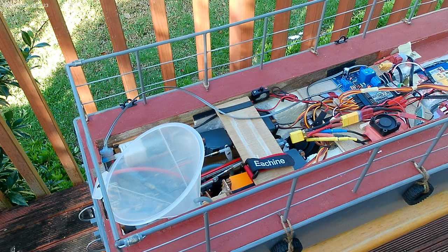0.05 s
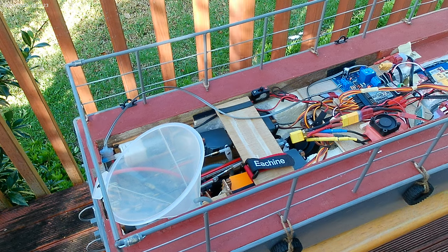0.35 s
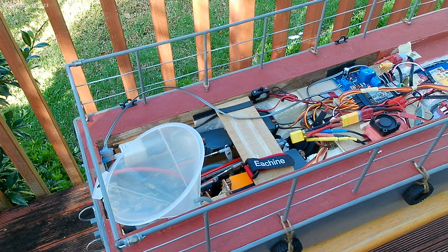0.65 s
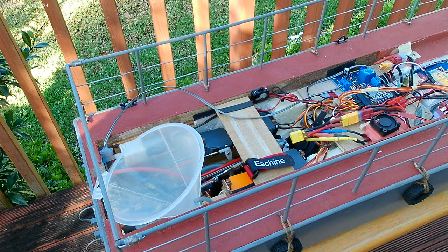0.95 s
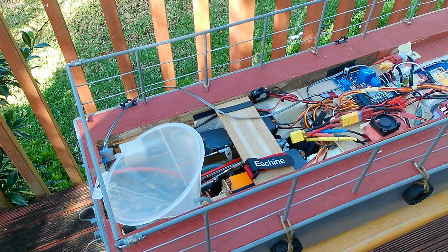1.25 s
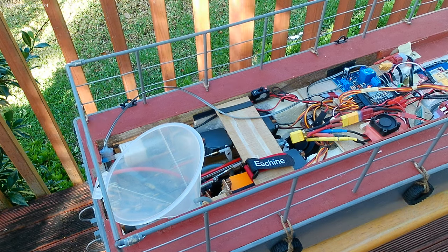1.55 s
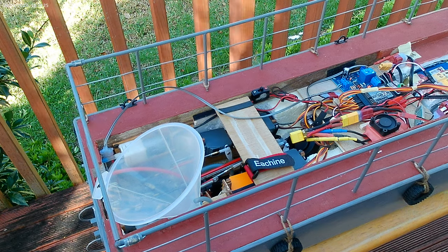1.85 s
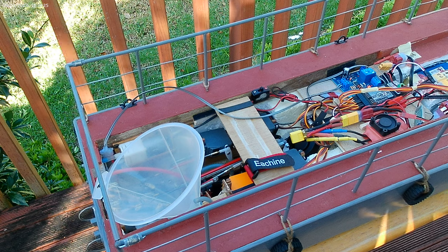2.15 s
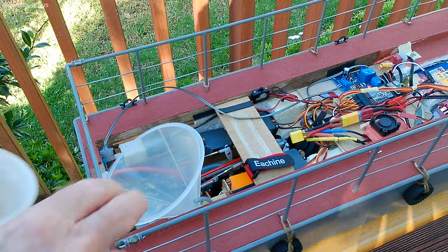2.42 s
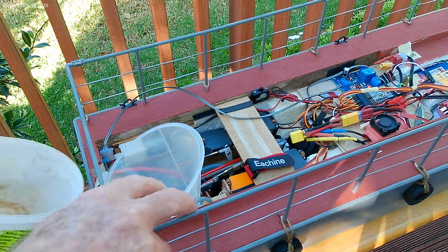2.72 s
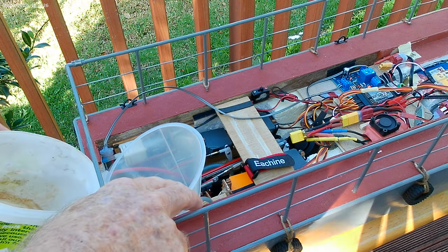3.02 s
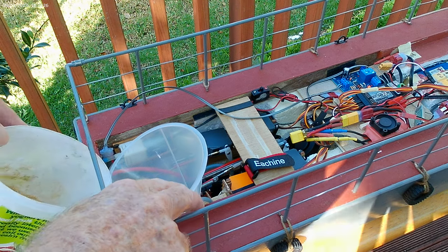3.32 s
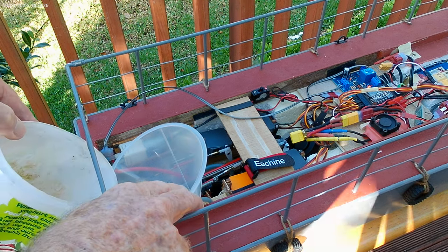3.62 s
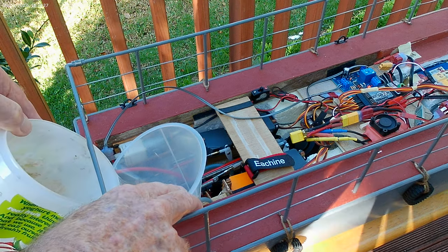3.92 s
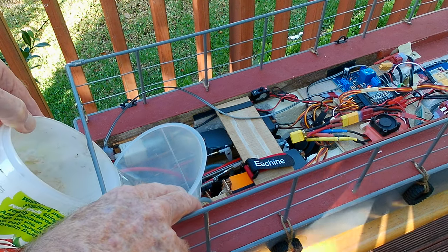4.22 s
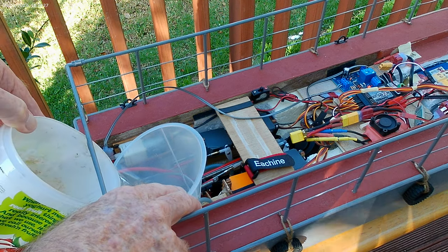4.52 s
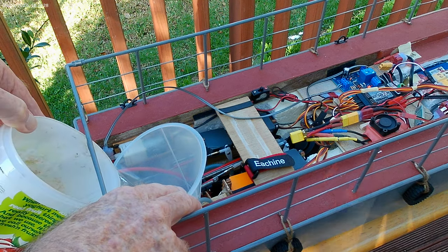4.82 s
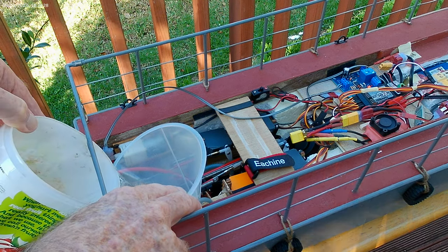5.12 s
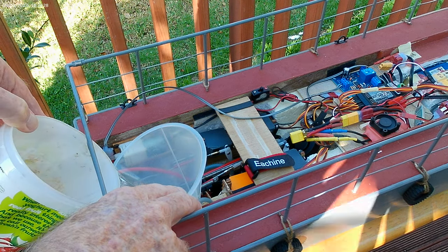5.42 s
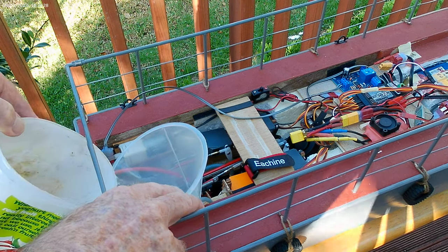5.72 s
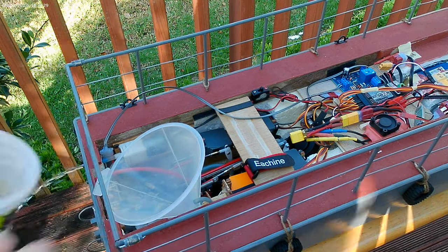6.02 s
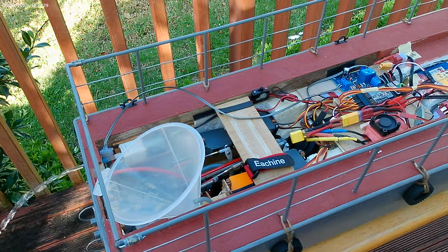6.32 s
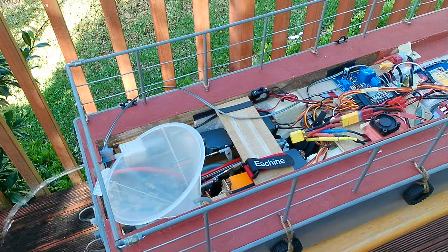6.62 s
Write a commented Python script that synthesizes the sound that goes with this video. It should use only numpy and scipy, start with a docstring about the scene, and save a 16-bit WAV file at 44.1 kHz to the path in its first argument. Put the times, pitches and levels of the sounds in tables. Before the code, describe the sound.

A small electronics fan in a model boat hums throughout, with airy hiss, a thin whine and a few faint high ticks. Behind it is low outdoor traffic rumble: one distant engine slows and fades by about 2 seconds, while another sags, then gradually gathers speed. A breeze softly thumps the microphone now and then, most strongly near 4.9 seconds. From 4 to about 5.3 seconds, water poured through a funnel drips and trickles into the hull with small knocks and bubbly plips. At 5.4 seconds a relay gives one sharp click, and a small electric pump starts at once. It gulps air with several glugs until about 5.9 seconds, then settles into a steady low hum and buzz through the hull, with churning water and a faint hissing jet, running until the end near 7 seconds.

```python
"""A model boat stands on a garden deck, its electronics fan humming; a breeze nudges the microphone.
Of two far engines, one slows and fades within two seconds, while the other sags, then gathers speed.
From 4 s, water poured through a funnel plips into the hull: each drop knocks and traps ringing bubbles.
At 5.4 s a relay clicks and a small bilge pump starts. Its impeller shakes the hull, gulps air,
churns the water and sends a thin, hissing jet overboard."""
import sys
import numpy as np
from scipy import signal
from scipy.fft import rfft, irfft, next_fast_len
from scipy.io import wavfile
from scipy.ndimage import uniform_filter1d

SR = 44100
rng = np.random.default_rng(int(sys.argv[2]) if len(sys.argv) > 2 else 0)


def file_out(sig):
    """Save sig as 16-bit WAV at sys.argv[1]."""
    # one column per channel
    cols = np.atleast_2d(sig).T
    # limit, then scale
    lim = np.clip(cols, -1, 1)
    pcm = np.round(lim * 32767).astype(np.int16)
    wavfile.write(sys.argv[1], SR, pcm)


N = 302194
T = np.arange(N) / SR

# eddies on the microphone and dull road rumble: frequency_hz, density_db
EDDY_SPECTRUM = [(10, -1.5), (22, -0.5), (40, -7), (65, -9), (110, -23.5), (250, -40)]
RUMBLE_SPECTRUM = [(35, 1), (52, 10), (75, -6), (100, 9.5), (140, -7.5), (190, -12.5)]
# gusts of wind: crest_s, half_length_s, level_db
GUSTS = [(.03, 0.18, -45.5), (.58, 0.031, -40), (1.83, 0.025, -45.5), (3.23, 0.12, -43.5),
         (3.62, 0.19, -41), (3.94, 0.071, -40), (4.77, 0.051, -37.5), (4.885, 0.042, -34),
         (6.0, 0.074, -43), (6.47, 0.036, -40)]
# fundamental of the slowing engine: time_s, pitch_hz
SLOWING_PITCH = [(0, 135.6), (.2, 137.9), (.72, 115.3), (1.12, 117.1), (1.36, 98.3), (1.8, 84.3)]
# its harmonics: multiple, relative_db
SLOWING_ORDERS = [(1, 1), (2, -14.5), (3, -21.5)]
# firing tone of the gathering engine: time_s, level_db
DRONE_LEVEL = [(0, -45), (1, -50), (1.93, -52.5), (2.2, -44.5), (2.85, -52), (3.6, -41.5), (3.9, -42),
               (4.5, -49), (5.3, -51.5), (5.85, -60), (6.25, -45), (6.85, -49)]
# its weaker orders: firing_multiple, level_db
DRONE_ORDERS = [(1.399, -59), (1.82, -62.5), (2.41, -67)]
# its orders that swell and ebb: firing_multiple, crest_s, half_length_s, level_db
WHIRS = [(2.41, 1.7, 0.22, -54.5), (2.41, 2.82, 0.7, -55), (3.4, 2.73, 0.39, -64), (2, 4.06, 0.56, -53),
         (2, 6.06, 0.63, -52.5)]

# fourth harmonic of the fan's shaft: time_s, pitch_hz
FAN_PITCH = [(0.0, 637.4), (0.5, 644.5), (2.26, 645), (3.04, 646), (6.7, 643.4)]
# base level of the fan's hum: time_s, level_db
FAN_LEVEL = [(0, -62.5), (.6, -59.5), (2.2, -59), (3.4, -57), (4.2, -58.5), (5.4, -58), (5.8, -60),
             (6.85, -60.5)]
# its harmonics: shaft_multiple, relative_db
FAN_ORDERS = [(1, -15.5), (2, -15), (3, -7), (4, -2), (5, -4), (6, -15.5), (7, -14.5), (8, -23.5),
              (10, -23.5), (12, -30)]
# thin electric whine: time_s, pitch_hz
WHINE_PITCH = [(0, 2007), (2.2, 2014), (4.6, 2015), (5.35, 2028), (5.8, 2038), (6.3, 2031), (6.85, 2017)]
# its strength: time_s, level_db
WHINE_LEVEL = [(0, -74.5), (.6, -72), (1.4, -74), (2.5, -71.5), (4.0, -76), (5.0, -73.5), (5.85, -71),
               (6.85, -73)]
# rush and hiss of fan air and garden: frequency_hz, density_db
AIR_SPECTRUM = [(150, 2.5), (250, -6), (430, -8.5), (700, -7.5), (950, -6.5), (1150, -11.5), (1400, -18.5),
                (1800, -20.5), (2700, -22.5), (3000, -28.5)]
HISS_SPECTRUM = [(3050, -13.5), (3550, 2), (3950, -0.5), (4500, 1), (5300, 3.5), (6300, -2), (7100, -7.5),
                 (9000, -7.5), (10100, -3.5), (11200, -13.5), (15500, -14.5)]
# faint, soft, very high chirps and ticks: start_s, level_db, pitch_hz
TICKS = [(.208, -56, 14100), (.241, -57, 12300), (0.686, -63, 13770), (1.507, -64, 13400),
         (1.705, -66, 13400), (1.985, -61, 13000), (3.28, -65, 13500), (4.006, -58.5, 9150),
         (4.46, -60.5, 9200), (4.838, -57, 5450), (4.947, -62, 7200), (5.3385, -55, 5500),
         (5.371, -54, 5170), (5.835, -56, 5000), (6.694, -58, 13140)]

# swishes of running water: crest_s, length_s, level_db, centre_hz, width_octaves
SWISHES = [(0.096, 0.94, -65.5, 930, 0.75), (1.115, 0.12, -66.5, 4330, 0.46), (1.125, .1, -76, 9600, .4),
           (1.125, 0.12, -63, 1490, 1.2), (4.455, 0.11, -64.5, 1370, 0.8), (4.849, 0.28, -68, 1400, 1.1),
           (5.483, 0.14, -57.5, 1010, 0.81), (5.492, 0.16, -54, 730, 0.87), (5.802, .08, -55, 790, 0.87),
           (5.835, 0.071, -58.5, 1480, 0.63), (5.814, 0.061, -67, 2900, 0.67),
           (6.771, 0.17, -69, 3300, 1.1)]
# drops and their two bubbles: start_s, knock_db, large_hz, large_db, small_hz, small_db
DROPS = [(4.006, -54, 1520, -54, 2300, -67), (4.291, -54, 1350, -58, 2520, -64),
         (4.301, -54, 2330, -54, 2800, -61), (4.341, -48, 1130, -59, 2300, -58),
         (4.3799, -38, 1590, -57, 2110, -53), (4.421, -51, 1250, -53, 3700, -60),
         (4.438, -60, 1450, -57, 3750, -60), (4.463, -55, 1300, -57, 2100, -62),
         (4.551, -58, 1900, -63, 2980, -58), (4.573, -45, 2000, -48, 4530, -52),
         (4.785, -47, 1420, -57, 2300, -58), (4.798, -55, 1100, -54, 2400, -59),
         (4.8255, -47, 1090, -44.5, 3680, -50), (4.8546, -49, 1580, -51, 2650, -63),
         (4.872, -60, 1500, -63, 3400, -60), (4.9163, -56, 1390, -50, 1950, -65),
         (4.9493, -57, 1210, -55, 1750, -64), (5.117, -59, 1300, -59, 2500, -61),
         (5.147, -52, 1230, -54, 3620, -54.5), (5.304, -54, 1250, -59, 2400, -64),
         (5.3266, -45, 1570, -46, 2180, -52)]
# resonances of the hull cavity: pitch_hz, t60_s, relative_db
HULL_MODES = [(970, .022, -6), (1427, 0.0033, 3), (2298, 0.0038, -18), (3700, .014, -29), (4740, .014, -37)]
# dull splat of a drop: frequency_hz, density_db
SPLAT_SPECTRUM = [(700, 6), (1500, 2), (2400, -6), (3100, -21), (3800, -9), (5000, -17), (9000, -26)]
# noise band of a swish: offset_widths, density_db
SWISH_BAND = [(-1.2, -18), (-0.083, -2.5), (0.74, -14.5), (1.47, -23.5)]

# the relay's contact and its bounces: start_s, level_db
RELAY_STRIKES = [(5.40165, -28.5), (5.4038, -43), (5.4145, -53)]
# resonances of its case and of the board that carries it: pitch_hz, t60_s, relative_db
CASE_MODES = [(3750, 0.035, -20.5), (5050, .03, -14), (5620, 0.013, -1), (6080, 0.01, -4),
              (6640, 0.0091, -13), (7100, 0.02, -8), (8500, .012, -14), (8850, .016, -16),
              (10780, .02, -15.5), (13840, 0.013, -12)]
BOARD_MODES = [(1050, 0.041, 2), (1230, 0.032, -5), (700, .03, -16)]
# snap of the contact: frequency_hz, density_db
SNAP_SPECTRUM = [(5100, 0), (5800, 5), (7500, 0), (11000, -9), (14000, -13), (15500, -18)]

# air gulped as the pump catches water: start_s, pitch_hz, level_db, rise_per_s
GLUGS = [(5.484, 1150, -44, 3), (5.613, 1270, -45, 3), (5.781, 756, -39.5, 4.3), (5.815, 880, -44, 14),
         (5.818, 3200, -46, 6), (5.819, 2700, -53, 3), (5.834, 1950, -50, 6.2), (5.836, 2750, -56, 3),
         (5.841, 1150, -44, 6), (5.851, 1600, -58, 4)]
# spurts of air from the outlet: crest_s, half_length_s, level_db
SPURTS = [(5.5, 0.035, -70), (5.89, 0.096, -74)]
# airy whistles of the jet: shaft_multiple, level_db
WHISTLES = [(129.5, -82), (145, -98)]
# spray at the outlet and water churned in the pump: frequency_hz, density_db
SPRAY_SPECTRUM = [(4000, -11), (7000, 0), (8200, 2), (9100, 7), (10500, -10), (15000, -18)]
CHURN_SPECTRUM = [(100, -7), (260, 3.5), (450, -8), (720, -2.8), (1150, -7.5), (1500, -17), (2200, -15.5),
                  (3200, -24), (6000, -30.5), (12000, -41)]
# rotation of the pump: time_s, shaft_hz
PUMP_SPEED = [(5.45, 64.57), (5.578, 62.52), (5.706, 61.73), (5.932, 61.1), (6.144, 62.44), (6.37, 62.3),
              (6.47, 61.7), (6.622, 60.92), (6.85, 60.7)]
# its harmonics through the hull: shaft_multiple, level_db
PUMP_ORDERS = [(3, -66), (4, -60.3), (5, -67.5), (6, -63.5), (7, -77), (8, -72), (9, -65.5), (10, -67),
               (11, -75), (12, -61.7), (13, -66), (14, -77), (15, -59.3), (16, -73), (17, -69.5), (18, -75),
               (19, -66.3), (20, -72), (21, -80), (22, -74.5), (23, -79.5), (24, -77.5), (25, -86),
               (26, -84), (28, -79.5), (29, -85.5)]

PUMP_ON_S = 5.41
RING_SAMPLES = SR // 8


def undb(db):
    """Amplitude grows tenfold for every 20 decibels."""
    return 10 ** (np.asarray(db) / 20)


def unit(x):
    """Normalisation to rms 1."""
    return x / (np.std(x) + 1e-12)


def curve(rows):
    """Linear interpolation of (time_s, value) rows at every sample."""
    return np.interp(T, *np.transpose(rows))


def ramp(start_s, length_s):
    """A linear rise from 0 to 1."""
    return np.clip((T - start_s) / length_s, 0, 1)


def bell(crest_s, half_s):
    """A Gaussian swell from 0 to 1 and back."""
    return np.exp(-((T - crest_s) / half_s) ** 2)


def surges(rows, steady_db):
    """Incoherent sources add in power: the gain of a steady flow with surges on top."""
    surge_power = sum((undb(db) * bell(crest_s, half_s)) ** 2 for crest_s, half_s, db in rows)
    return np.sqrt(undb(steady_db) ** 2 + surge_power)


def noise():
    """White noise has equal power at all frequencies."""
    return rng.standard_normal(N)


def walk(rate_hz):
    """Moving averages smooth random steps into a wander of spread 1."""
    hold = int(SR / rate_hz)
    steps = np.repeat(rng.standard_normal(N // hold + 1), hold)
    return unit(uniform_filter1d(uniform_filter1d(steps, hold), hold)[:N])


def colour(x, spectrum):
    """Spectral shaping by (frequency_hz, density_db) points, steep beyond their ends; rms 1."""
    hz, db = np.transpose(spectrum)
    size = next_fast_len(len(x), real=True)
    log_hz = np.log(np.arange(size // 2 + 1) * SR / size + 1e-3)
    skirt_db = -100 * abs(log_hz - np.clip(log_hz, np.log(hz[0]), np.log(hz[-1])))
    gain = undb(np.interp(log_hz, np.log(hz), db) + skirt_db)
    return unit(irfft(rfft(x, size) * gain, size)[:len(x)])


def turn(hz):
    """Phase is the integral of frequency, here from a random starting angle."""
    return 2 * np.pi * (np.cumsum(hz) / SR + rng.random())


def tone(angle, db, waver_db=0, rate_hz=8):
    """A sinusoid at an rms level, with optional random amplitude modulation."""
    return np.sqrt(2) * np.sin(angle + 2 * np.pi * rng.random()) * undb(db + waver_db * walk(rate_hz))


def ring(modes):
    """A struck body vibrates as a sum of damped modes; peak 1."""
    t = T[:RING_SAMPLES]
    vibration = sum(undb(db - 60 * t / t60_s) * np.sin(2 * np.pi * hz * t) for hz, t60_s, db in modes)
    return vibration / np.max(abs(vibration))


def crack(spectrum, t60_s):
    """A noise burst that decays exponentially; peak 1."""
    t = T[:RING_SAMPLES]
    burst = colour(rng.standard_normal(len(t)), spectrum) * undb(-60 * t / t60_s)
    return burst / np.max(abs(burst))


def add(out, start_s, x):
    """Superposition of x on out; whatever lies outside it is dropped."""
    i = int(start_s * SR)
    x, i = x[max(-i, 0):], max(i, 0)
    out[i:i + len(x)] += x[:max(len(out) - i, 0)]


def breeze(calm_db=-52.5):
    """Turbulent eddies press on the microphone, thumping softly in the gusts."""
    return colour(noise(), EDDY_SPECTRUM) * surges(GUSTS, calm_db + 0.5 * walk(4.1))


def slowing_engine(ease_s=0.404, ease_width_s=0.069, fade_from_s=1.07, fade_db_per_s=37):
    """Pitch follows crank speed: an engine slows, comes off the throttle, returns duller and fades."""
    crank = turn(curve(SLOWING_PITCH))
    db = -49 - 15 * bell(ease_s, ease_width_s) - fade_db_per_s * np.maximum(T - fade_from_s, 0)
    dulling_db = 8 * ramp(ease_s, ease_width_s)
    return sum(tone(k * crank, db + relative_db - (k - 1) * dulling_db)
               for k, relative_db in SLOWING_ORDERS)


def gathering_engine(lowest_s=2.05, lowest_hz=52.76, sag_hz_per_s=2.7, rise_hz_per_s=3.65):
    """Engine orders keep fixed ratios to the firing rate, which sags, then climbs evenly."""
    since_s = T - lowest_s
    firing = turn(lowest_hz + np.maximum(-sag_hz_per_s * since_s, rise_hz_per_s * since_s))
    drone = tone(firing, curve(DRONE_LEVEL))
    drone += sum(tone(k * firing, db, waver_db=0.5, rate_hz=2.07) for k, db in DRONE_ORDERS)
    whirs = sum(tone(k * firing, db) * bell(crest_s, half_s) for k, crest_s, half_s, db in WHIRS)
    return drone + whirs


def traffic(rumble_db=-53):
    """Low frequencies carry farthest: the lowest orders of two engines over the road's rumble."""
    rumble = colour(noise(), RUMBLE_SPECTRUM)
    return slowing_engine() + gathering_engine() + rumble * undb(rumble_db - walk(2))


def fan(air_db=-59, hiss_db=-72):
    """Periodic rotation gives shaft harmonics and air that pulses each turn, beside an electric whine."""
    hum_db = curve(FAN_LEVEL)
    shaft = turn(curve(FAN_PITCH) / 4 * (1 + 0.001 * walk(20)))
    hum = sum(tone(k * shaft, hum_db + relative_db, waver_db=0.03) for k, relative_db in FAN_ORDERS)
    whine_angle = turn(curve(WHINE_PITCH) + 1.5 * walk(25))
    whine = tone(whine_angle, curve(WHINE_LEVEL), waver_db=0.4)
    pulsing = noise() * (1 + 0.027 * np.cos(shaft))
    air = colour(pulsing, AIR_SPECTRUM) * undb(air_db + 0.5 * walk(6.6))
    swell_db = 0.21 * (hum_db - hum_db.mean())
    hiss = colour(noise(), HISS_SPECTRUM) * undb(hiss_db + swell_db + 0.38 * walk(8.7))
    return hum + whine + air + hiss


def ticks(spread=1.2, attack_s=0.0043):
    """Brief narrow-band noise has a pitch: faint, soft, very high chirps and ticks."""
    out = np.zeros(N)
    for start_s, db, hz in TICKS:
        burst = crack([(hz / spread, -14), (hz, 0), (hz * spread, -14)], t60_s=0.059)
        add(out, start_s, undb(db) * burst * ramp(0, attack_s)[:RING_SAMPLES])
    return out


def swish(length_s, centre_hz, width_octaves, grain_samples=200):
    """Running water gives band noise, made grainy by random modulation, in one soft swell."""
    size = int(length_s * SR)
    white = rng.standard_normal(size)
    grain_db = 2 * np.repeat(rng.standard_normal(size // grain_samples + 1), grain_samples)[:size]
    band = [(centre_hz * 2 ** (width_octaves * offset), db) for offset, db in SWISH_BAND]
    swell = np.sin(np.pi * np.arange(size) / size)
    return swell * colour(white * undb(grain_db), band)


def bubble(hz, rise_per_s=3.5, t60_cycles=40):
    """Trapped air is a damped resonator of rising pitch; small, high bubbles die sooner."""
    t = T[:RING_SAMPLES]
    return np.sin(2 * np.pi * hz * t * (1 + rise_per_s * t)) * undb(-60 * t * hz / t60_cycles)


def splash(count, within_s=0.085, centre_hz=1710):
    """Secondary droplets fall back and excite bubbles, the late ones weaker."""
    out = np.zeros(SR // 4)
    for late, pitch in rng.random((count, 2)):
        add(out, within_s * late, (1 - late / 2) * bubble(centre_hz * 2 ** (pitch - 0.5)))
    return out


def drop(knock_db, large_hz, large_db, small_hz, small_db, crater_s=0.001197):
    """An impact excites the hull's modes with a splat; the closing crater traps two bubbles."""
    splat = undb(-10.5) * crack(SPLAT_SPECTRUM, t60_s=0.046)
    onset = ramp(0, 0.0002)[:RING_SAMPLES]  # water yields, softening the attack
    plip = undb(knock_db) * (ring(HULL_MODES) + splat) * onset
    add(plip, crater_s, undb(large_db) * bubble(large_hz) + undb(small_db) * bubble(small_hz))
    return plip


def trickle(count, start_s=4.33, length_s=0.97, centre_hz=1400):
    """Faint impacts of random pitch and strength, loosely spaced, merge into a trickle."""
    out = np.zeros(N)
    for i, (late, pitch, size) in enumerate(rng.uniform(-1, 1, size=(count, 3))):
        landing_s = start_s + length_s * (i + late / 2) / count
        hz, db = centre_hz * 2 ** (pitch / 2), -62 + 3 * size
        add(out, landing_s, drop(db + 3, hz, db, 2 * hz, db - 1.5))
    return out


def water(splash_db=-26, glug_attack_s=0.0027):
    """Water sounds by impact, bubble resonance and flow: drops, the pump's glugs and swishes."""
    out = np.zeros(N)
    for start_s, knock_db, *bubbles in DROPS:
        add(out, start_s, drop(knock_db, *bubbles))
        add(out, start_s, undb(knock_db + splash_db) * splash(count=5))
    for start_s, hz, db, rise_per_s in GLUGS:
        add(out, start_s, undb(db) * bubble(hz, rise_per_s) * ramp(0, glug_attack_s)[:RING_SAMPLES])
    for crest_s, length_s, db, hz, octaves in SWISHES:
        add(out, crest_s - length_s / 2, undb(db) * swish(length_s, hz, octaves))
    return out


def relay(board_lag_s=0.00216):
    """Impulse excitation: the contact shuts and bounces twice, ringing its case; the board knocks."""
    out = np.zeros(N)
    case = ring(CASE_MODES) * ramp(0, 0.0004)[:RING_SAMPLES]  # it takes a moment to start swinging
    for start_s, db in RELAY_STRIKES:
        snap = undb(-9.5) * crack(SNAP_SPECTRUM, t60_s=0.024)
        add(out, start_s, undb(db) * (case + snap))
    first_bounce_s = RELAY_STRIKES[1][0]
    add(out, first_bounce_s + board_lag_s, undb(-39.5) * ring(BOARD_MODES))
    return out


def jet(shaft, shaft_hz, ease_db_per_s=4.5, whistle_db_per_hz=2):
    """Flow noise: spray spurts, then eases as the hose fills; airy whistles follow the pump's speed."""
    flow = surges(SPURTS, -76 - ease_db_per_s * (T - PUMP_ON_S))
    spray = colour(noise() * undb(2.1 * walk(700)), SPRAY_SPECTRUM) * flow
    speed_db = whistle_db_per_hz * (shaft_hz - shaft_hz[-1])
    # multiplying by low noise spreads each tone into a breathy band
    whistles = sum(colour(noise(), [(20, -8), (130, 5), (400, -11)]) * tone(k * shaft, db + speed_db)
                   for k, db in WHISTLES)
    return (spray + ramp(start_s=5.8, length_s=0.25) * whistles) * undb(1.3 * walk(30))


def churn(shaft):
    """Amplitude modulation: the impeller chops the water's noise once a turn."""
    chopped = noise() * (1 + 0.24 * np.cos(shaft)) * undb(2 * walk(90))
    gulp_dip_db = bell(PUMP_ON_S, half_s=0.097)  # slightly quieter while the pump gulps air
    return colour(chopped, CHURN_SPECTRUM) * undb(-58.5 - gulp_dip_db + 1.21 * walk(9))


def hull_buzz(shaft, shaft_hz, panel_hz=1159, panel_width_hz=19, panel_db=7):
    """Forced vibration: pump harmonics shake the hull, and a panel resonates with any near its pitch."""
    buzz = 0
    for k, db in PUMP_ORDERS:
        resonance_db = panel_db * np.exp(-((k * shaft_hz - panel_hz) / panel_width_hz) ** 2)
        flutter_db = 1.5 * walk(45.3)
        buzz += tone(k * shaft, db + resonance_db + flutter_db, waver_db=0.6, rate_hz=7)
    return buzz * undb(-1.5 + 0.5 * (T - PUMP_ON_S))  # firms up as the air clears


def pump(jitter=0.0016, spin_up_s=0.0086, priming_s=0.13):
    """A rotating impeller, loaded unevenly by air in the water, drives hum, buzz, churn and jet."""
    shaft_hz = curve(PUMP_SPEED)
    shaft = turn(shaft_hz * (1 + jitter * walk(50)))
    under_load = ramp(start_s=5.58, length_s=0.03)
    lift_db = 3.5 * bell(crest_s=6.06, half_s=0.27)  # water is lifted up the hose
    hum = under_load * tone(2 * shaft, -49 + lift_db, waver_db=1, rate_hz=9.9)
    buzz = ramp(PUMP_ON_S, priming_s) * hull_buzz(shaft, shaft_hz)
    flow = ramp(PUMP_ON_S, spin_up_s) * (churn(shaft) + jet(shaft, shaft_hz))
    return hum + buzz + flow


def scene():
    """In the open air the direct sounds add by superposition, in one channel."""
    return (fan() + traffic() + breeze() + pump() + water() + ticks() + trickle(count=21) + relay())[None]


def record(dry):
    """Band limiting: a steep elliptic low-pass removes the highest treble."""
    cutoff_hz = 15720
    return signal.sosfilt(signal.ellip(10, 0.2, 70, cutoff_hz, fs=SR, output="sos"), dry)


dry = scene()
out = record(dry)
file_out(out)
```